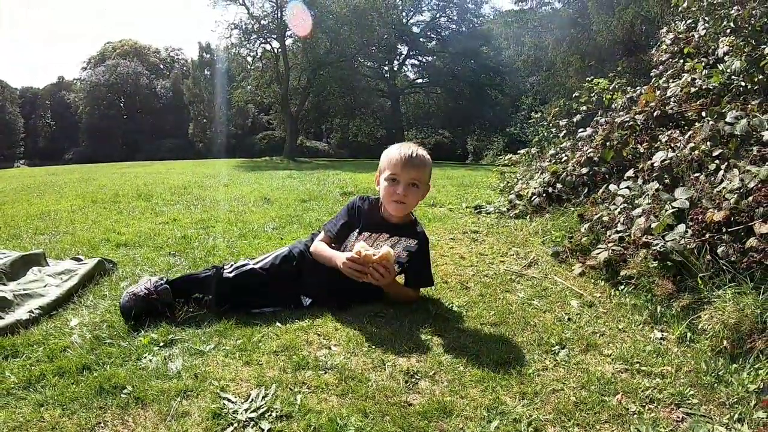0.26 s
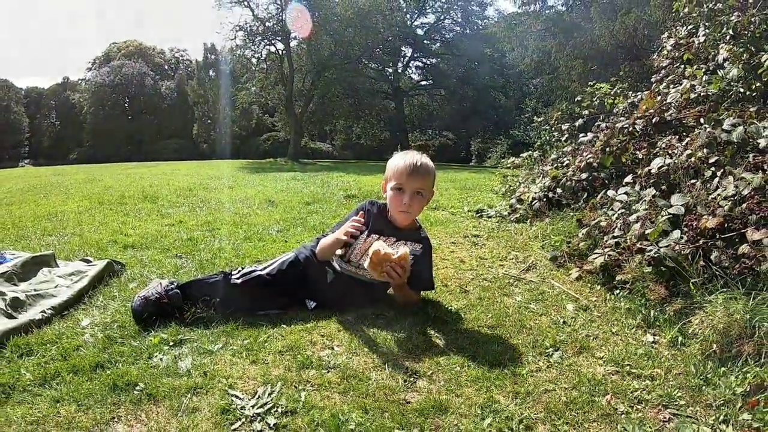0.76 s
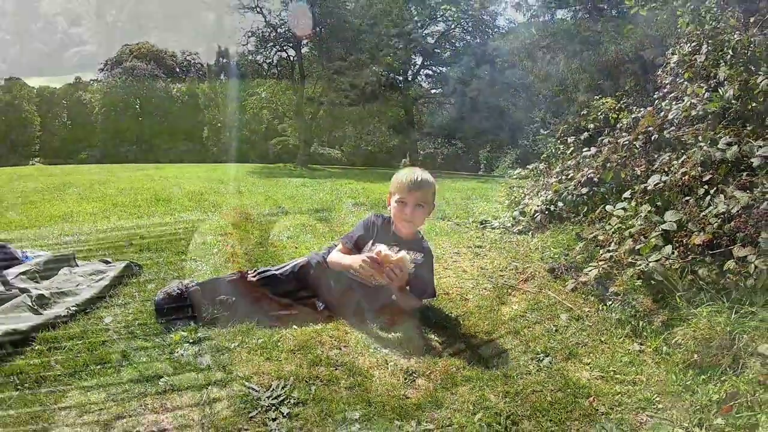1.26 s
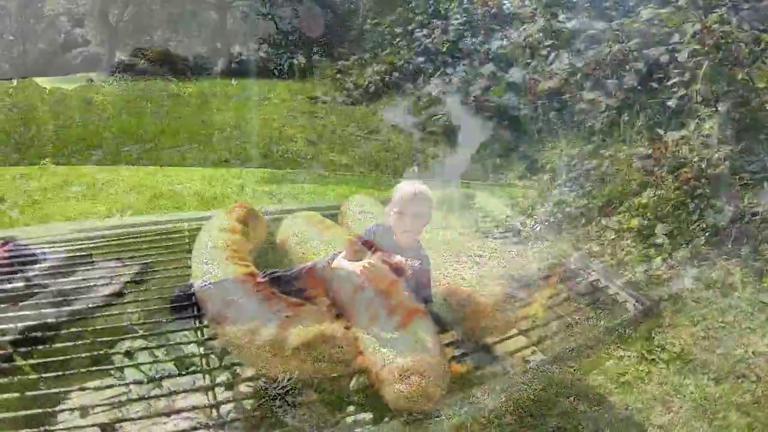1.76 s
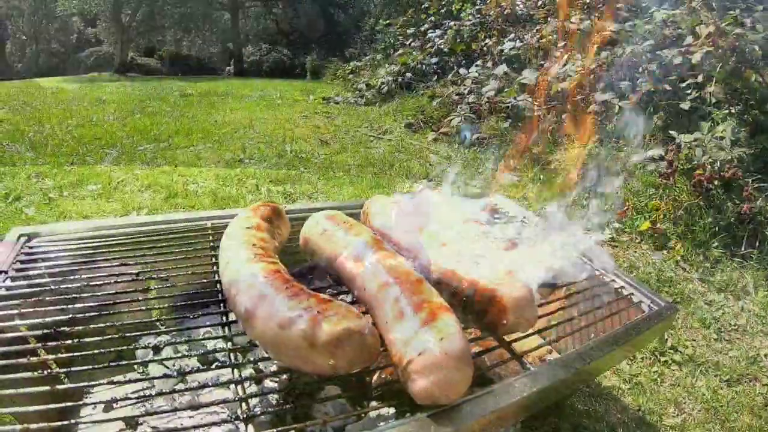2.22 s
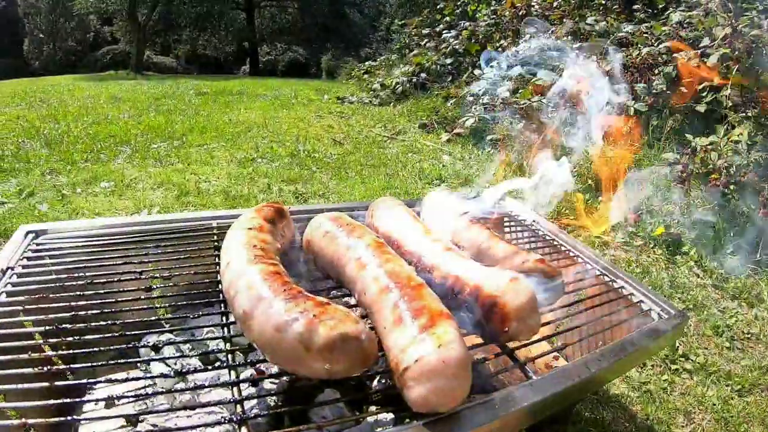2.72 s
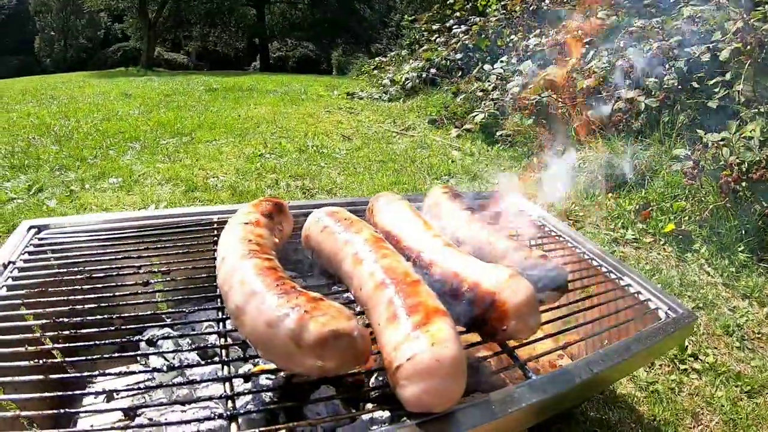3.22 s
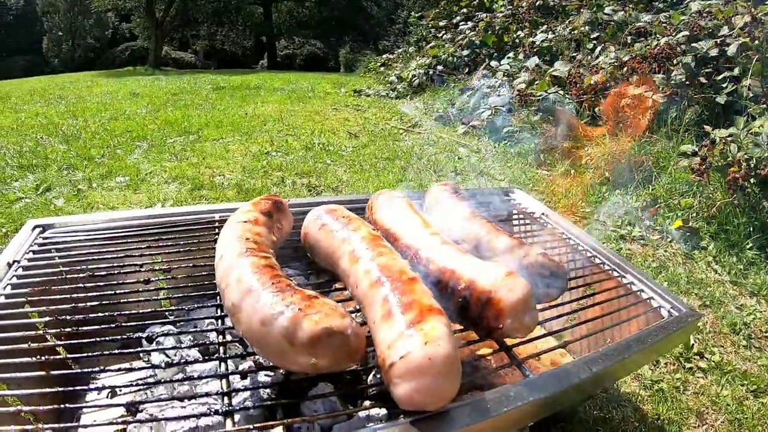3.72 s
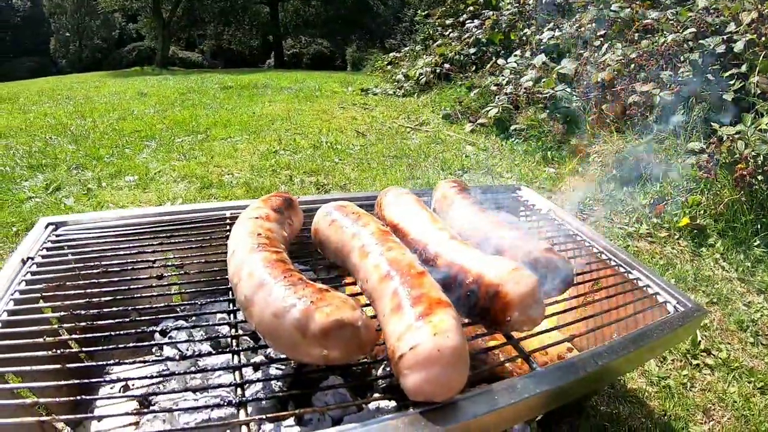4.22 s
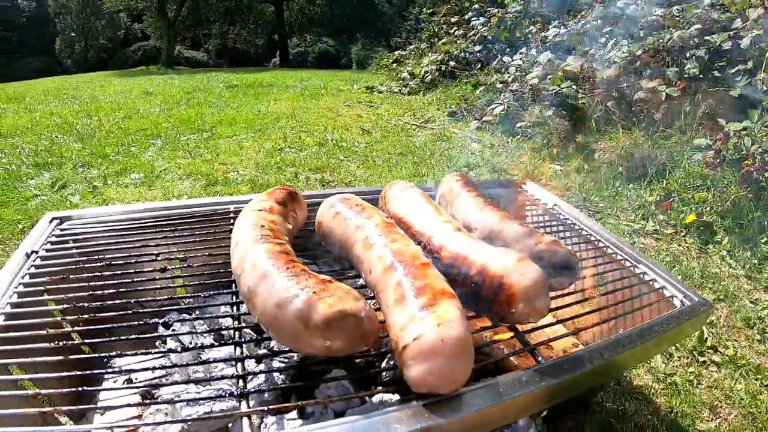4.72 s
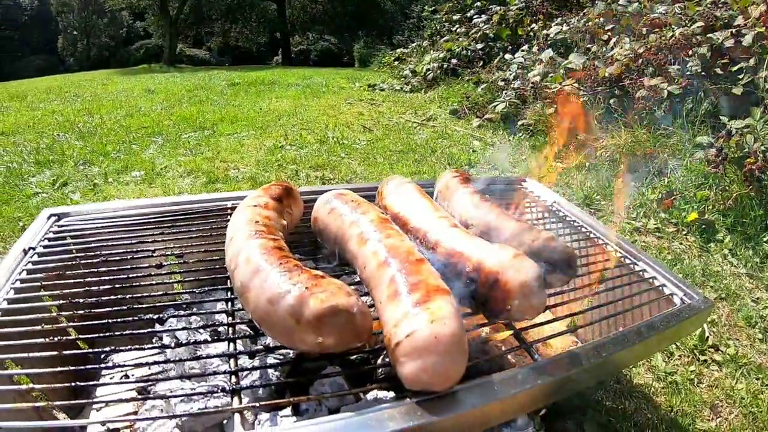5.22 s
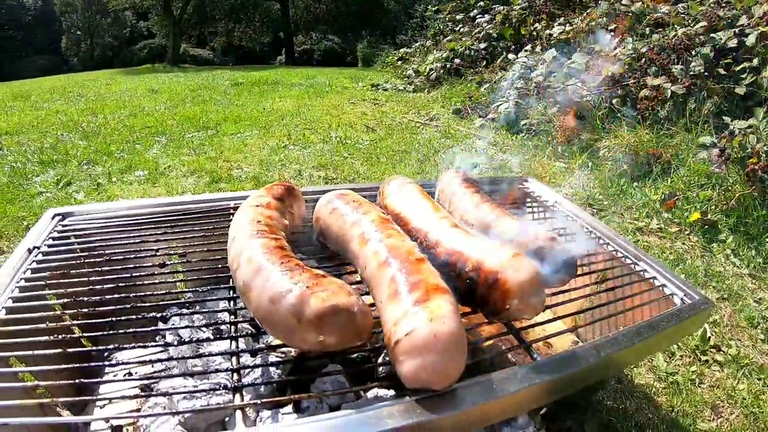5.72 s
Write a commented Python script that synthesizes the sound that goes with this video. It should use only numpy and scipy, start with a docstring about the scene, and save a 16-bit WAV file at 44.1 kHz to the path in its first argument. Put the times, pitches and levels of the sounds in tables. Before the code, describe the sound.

In a quiet park with faint low traffic rumble, a soft bump starts a crisp paper wrapper rustling and creasing at the right. It cuts abruptly to a short silence, then a close charcoal grill fades in quickly: dense sizzling, low flame flutter, sharp spits of fat. Mostly central at first, the sizzle eases and widens later, with brief flare-ups.

```python
"""Far traffic rumbles across a park lawn; a paper wrapper rustles and creases on the right, with two bumps.
The sound cuts out, and a charcoal grill fades in close to the microphone: flames flutter, fat sizzles and spits.
Far and flame layers are coloured noise, paper and fat are clumps of clicks over patchy hiss, creases and spits
are short shaped bursts. A steel tray returns the body of the sizzle and spits a moment later."""
import sys
import numpy as np
from scipy import signal
from scipy.fft import rfft, irfft, next_fast_len
from scipy.io import wavfile
from scipy.ndimage import uniform_filter1d, map_coordinates

SR = 44100
rng = np.random.default_rng(int(sys.argv[2]) if len(sys.argv) > 2 else 0)


def dump(signal):
    """Clip the signal to [-1, 1] and save it as 16-bit WAV at the path in sys.argv[1]."""
    limited = np.clip(np.atleast_2d(signal).T, -1, 1)
    pcm = np.round(limited * 32767).astype(np.int16)
    wavfile.write(sys.argv[1], SR, pcm)


N = 263365

# Spectrum of the far traffic: pitch_hz, relative level_db (per Hz)
TRAFFIC_SPECTRUM = [(65, -46), (110, -11.5), (174, -2), (260, -13), (470, -19), (533, -23), (1280, -21),
                    (7000, -39), (13000, -57.5)]
# Spectrum of the low drone: pitch_hz, relative level_db (per Hz)
DRONE_SPECTRUM = [(25, -31), (50, -12.5), (65, -3.5), (80, -10), (150, -23.5), (300, -38)]
# Faint far tones: pitch_hz, level_db, start_s, end_s
FAR_TONES = [(610, -65.5, 0.14, 0.7), (1088, -66, 0.05, 2)]
# Path of a far whine that rises and sinks: time_s, pitch_hz
GLIDE_PATH = [(0.62, 651), (0.85, 702), (1.1, 742), (1.55, 695.5)]
# Thuds with a tick: start_s, thud_db (nominal, before dulling), thud_hz, tick_over_thud_db
BUMP_EVENTS = [(.388, -21.5, 174, 1.5), (1.228, -25, 201, 8)]
# Resonances of the paper sheet: pitch_hz, width_hz, level_db
PAPER_MODES = [(768, 250, -8), (1600, 173, -1.5), (2367, 190, 2), (3490, 420, 1.5), (4730, 326, 3),
               (6420, 1170, -7.5), (7520, 540, -5), (9350, 1900, -15)]
# Strokes of the hand on the paper: start_s, end_s, level_db (nominal; the stroke ends 1 dB below it)
HAND_STROKES = [(0.552, 0.58, -48), (0.71, .77, -51), (0.793, 1.032, -35.5), (1.07, 1.11, -43),
                (1.13, 1.215, -37), (1.268, 1.296, -40), (1.342, 1.443, -36.5), (1.585, 1.657, -40)]
# Hard creases: start_s, peak_db (mean of both ears)
CREASE_EVENTS = [(0.479, -41), (0.798, -24.5), (0.8625, -21), (1.0115, -18), (1.031, -17.5), (1.1288, -27),
                 (1.1316, -21.5), (1.172, -24), (1.217, -22), (1.284, -24), (1.371, -25), (1.4189, -22.5),
                 (1.436, -29), (1.505, -30), (1.5467, -27.5), (1.6465, -28)]
# The creases drift to the middle: time_s, left_over_right_db
CREASE_DRIFT = [(1.3, -10.5), (1.55, -6), (1.65, -1.5)]
# Grill between the flares: time_s, sizzle_db, fizz_db
GRILL_LEVELS = [(1.9, -36.5, -60), (2.3, -34, -53.5), (3.2, -33, -51.5), (4.0, -33.5, -52.5),
                (4.46, -37.5, -54), (4.8, -36.5, -49), (5.16, -37.5, -48), (5.47, -40, -49.5),
                (5.7, -40, -49), (5.95, -37.5, -46.5)]
# Fat drips on the coals: start_s, rise_db, calming_s
DRIP_FLARES = [(2.25, 3, 0.11), (2.44, 3, 0.06), (4.311, 7, 0.059), (4.37, 3, 0.043), (5.204, 9, 0.072),
               (5.51, 5, 0.09), (5.714, 8.5, 0.0222), (5.81, 6, 0.138)]
# Spectrum of the flames: pitch_hz, relative level_db (per Hz)
FLAME_SPECTRUM = [(18, -33), (30, -8), (54, 0.5), (171, -1), (308, -7.5), (381, -13.5), (520, -20.5),
                  (680, -63)]
# Spectrum of the sizzling body: pitch_hz, relative level_db (per Hz)
SIZZLE_SPECTRUM = [(300, 3), (500, 3.5), (800, 5), (1020, 0.5), (1450, 0), (2000, -4.5), (3300, 2.5),
                   (4500, -0.5), (5200, -14), (6000, -92)]
# Spectrum of the treble fizz: pitch_hz, relative level_db (per Hz)
FIZZ_SPECTRUM = [(3180, -54), (5400, 4.5), (5760, -0.5), (6560, 1.5), (8150, -2), (9160, 0), (11200, -8),
                 (14600, -29)]
# Spectrum of the top treble: pitch_hz, relative level_db (per Hz)
AIR_SPECTRUM = [(10500, -42), (11300, -19.5), (13000, -6.5), (14500, -14.5), (15500, -20.5)]
# Level of the top treble against the fizz: time_s, level_db
AIR_LEVELS = [(2.1, -35), (2.5, -32), (2.75, -12.5), (4.3, -11), (4.8, -16), (5.9, -22)]
# Side level of lower sizzle, upper sizzle, fizz, top: start_s, duration_s, before_db, after_db
STEREO_SIDE = [(4, 0.76, -59, -15), (4.074, 0.92, -67.5, -13.5), (4.15, 0.216, -32.5, -0.5),
               (2.3, .2, -23, 1.5)]
# Spits of fat: start_s, peak_db, upper_over_lower_body_db, treble_over_peak_db
SPIT_EVENTS = [(2.0345, -20, 0, -7), (2.362, -21, 3, -27), (2.4636, -15.5, -3, -30), (2.4991, -13, 1, -22),
               (2.8092, -17.5, 0.5, -27), (2.9403, -15, -5.5, -20.5), (2.956, -20, 13, -6),
               (3.041, -29, 9, -4), (3.1, -18.5, 2, -27), (3.1271, -16.5, 0, -29), (3.427, -21, 4, -22),
               (3.5409, -14, -2, -15), (3.9744, -23, 5, -18), (4.233, -22, 6, -15), (4.285, -25, 2, -12),
               (4.322, -19.5, 9, -10), (4.348, -23, 10, -5), (4.415, -24, -11, -14),
               (4.671, -17.5, 15, -7.5), (4.68, -17.5, 10, -7), (4.775, -25, 13, -15),
               (4.8825, -25.5, -10, -22), (5.2113, -21, -7, -17), (5.217, -20.5, 1, -20),
               (5.227, -18, 7, -15), (5.359, -28, 15, 3), (5.512, -20, 1, -7), (5.811, -21, -7, -18),
               (5.874, -20, 1, -9), (5.9031, -12.5, 19, -6)]

LEAD = 256  # samples in a shaped burst before its blow


def amp(db):
    """Decibels to amplitude."""
    return 10 ** (np.asarray(db) / 20)


def unit(x):
    """Each channel brought to an RMS of 1."""
    return x / np.sqrt(np.mean(x ** 2, axis=-1, keepdims=True) + 1e-20)


def clock():
    """The time of every sample in seconds."""
    return np.arange(N) / SR


def ramp(start_s, over_s):
    """0 before the start, 1 once the span has passed."""
    return np.clip((clock() - start_s) / over_s, 0, 1)


def curves(rows):
    """One value per sample for each column after the time."""
    time_s, *columns = np.transpose(rows)
    return [np.interp(clock(), time_s, column) for column in columns]


def wobble(rate):
    """A smooth random curve, rate knots a second."""
    knots = rng.standard_normal(int(N * rate / SR) + 4)
    return map_coordinates(knots, [np.arange(N) * rate / SR])


def filtered(x, response):
    """x passed through a complex response of frequency."""
    m = next_fast_len(N + 8192)
    return irfft(rfft(x, m) * response(np.fft.rfftfreq(m, 1 / SR)), m)[..., :N]


def colour(points):
    """The gain through (Hz, dB) points on a log axis, closed outside them."""
    f, db = np.transpose(points)
    return lambda hz: amp(np.interp(np.log(hz + 1), np.log(f + 1), db, left=-120, right=-120))


def tinted(x, hz, width_hz, lift_db):
    """x with one band lifted by a level that may change in time."""
    band = filtered(x, lambda f: np.exp(-((f - hz) / width_hz) ** 2))
    return x + (amp(lift_db) - 1) * band


def passing(x, hz, width_hz, lift_db, until_s, fade_s):
    """A tint that fades out."""
    return tinted(x, hz, width_hz, lift_db * (1 - ramp(until_s, fade_s)))


def crackle(rate, spread_db, share, patchy_db):
    """Two white streams: patchy hiss plus tiny clicks of widely spread size that come in clumps."""
    z = signal.stft(rng.standard_normal((2, N)), nperseg=256)[2]
    patches = uniform_filter1d(rng.standard_normal(z.shape[1:]), size=5, axis=0)
    patches = uniform_filter1d(patches, size=10, axis=1)
    patch_gain = amp(patchy_db * patches / patches.std())
    hiss = signal.istft(z * patch_gain, nperseg=256)[1][:, :N]
    fires = rng.random(N) < rate / SR * amp(5 * wobble(30))
    size = np.minimum(rng.exponential(size=N), 3)
    clicks = fires * amp(spread_db * size) * np.sign(rng.standard_normal((2, N)))
    share = np.clip(share, 0, 1)  # power share of the clicks
    return np.sqrt(1 - share) * unit(hiss) + np.sqrt(share) * unit(clicks)


def puff(t60):
    """A burst of noise that starts at once and falls 60 dB in t60 seconds, peak 1."""
    burst = rng.standard_normal(SR // 20) * amp(-60 * np.arange(SR // 20) / SR / t60)
    return burst / np.abs(burst).max()


def shaped(burst, response):
    """A short burst through a response, each row brought to peak 1."""
    m = 4096
    spectrum = rfft(np.pad(burst, (LEAD, 0)), m)
    out = irfft(spectrum * response(np.fft.rfftfreq(m, 1 / SR)), m)
    return out / np.abs(out).max(axis=-1, keepdims=True)


def stereo(pair, side_db, lean=0):
    """Mid from the first stream; side from the second plus a lean (negative is right)."""
    side = amp(side_db) * pair[1] + lean * pair[0]
    return np.array([pair[0] + side, pair[0] - side])


def add(track, s, burst):
    """Mixes a burst in at time s."""
    part = track[..., round(s * SR):][..., :burst.shape[-1]]
    part += burst[..., :part.shape[-1]]


def far_whines():
    """Faint sines waver in level and phase; one more glides up and down in pitch."""
    tones = np.zeros(N)
    for hz, db, start_s, end_s in FAR_TONES:
        gate = ramp(start_s - 0.05, 0.057) * (1 - ramp(end_s, 0.05))
        phase = 2 * np.pi * hz * clock() + 0.4 * wobble(4.7)
        tones += gate * amp(db + 1.7 * wobble(7.1)) * np.sin(phase)
    glide_hz, = curves(GLIDE_PATH)
    glide = np.sin(2 * np.pi * np.cumsum(glide_hz) / SR)
    return tones + ramp(GLIDE_PATH[0][0], 0.23) * amp(-62 + 2 * wobble(8)) * glide


def traffic():
    """Far across the lawn: wide coloured noise, a low drone near mono and faint wavering tones."""
    far = unit(filtered(rng.standard_normal((2, N)), colour(TRAFFIC_SPECTRUM)))
    far_side = filtered(far[1], lambda hz: 1 / (1 + (250 / (hz + 1)) ** 2))  # lows stay central
    drone = unit(filtered(rng.standard_normal((2, N)), colour(DRONE_SPECTRUM)))
    return amp(-52) * stereo([far[0], far_side], -4.1) + amp(-41.5) * stereo(drone, -26) + far_whines()


def bumps():
    """A short dull tick that differs from ear to ear, then a soft low push."""
    push_lag_s = 0.0028
    out, t = np.zeros((2, N)), np.arange(SR // 20) / SR
    for s, db, hz, tick_db in BUMP_EVENTS:
        swell = np.e * t * hz / 0.47 * np.exp(-t * hz / 0.29)
        push = swell * np.sin(2 * np.pi * hz * t)
        add(out, s + push_lag_s, amp(db) * push)
        add(out, s, amp(db + tick_db) * stereo([puff(0.069), puff(0.035)], -3))
    return filtered(out, lambda hz: 1 / (1 + 1j * hz / 1200) / (1 + (hz / 11000) ** 8))


def hand():
    """Level of the rustle: each stroke sets in fast, swells and dies away over a faint shifting sheet."""
    swell_db, rise_db_per_s, fall_db_per_s = 2, 397.5, 218
    rest_db, rest_from_s = -49, 0.56
    t = clock()
    power = amp(2 * (rest_db - fall_db_per_s / 2 * np.maximum(rest_from_s - t, 0)))
    for start_s, end_s, db in HAND_STROKES:
        level_db = db - swell_db * (1.5 - ramp(start_s, end_s - start_s))
        level_db = level_db - rise_db_per_s * np.maximum(start_s - t, 0)
        level_db = level_db - fall_db_per_s * np.maximum(t - end_s, 0)
        power = power + amp(2 * level_db)
    return np.sqrt(power)


def sheet(f):
    """Response of the paper: broad resonances of alternating sign, rolled off at the top."""
    modes = 0
    for k, (hz, width_hz, db) in enumerate(PAPER_MODES):
        damping = 1j * f * width_hz
        modes = modes + (-1) ** k * amp(db) * damping / (hz * hz - f * f + damping)
    return modes / (1 + (f / 11000) ** 5)


def rustle():
    """Rubbed grains ring the sheet; it slackens, its resonances sink and its treble dulls as it softens."""
    slack, slack_ratio = ramp(1.3, 0.5), 0.9206
    bright_db = -3 - 3 * np.maximum(clock() - HAND_STROKES[0][0], 0)  # dulls by 3 dB per second
    rub = crackle(1800, 8.4, 0.34, patchy_db=1.5) * amp(1.12 * wobble(24.96))
    taut_grains = filtered(rub * (1 - slack), sheet)
    grains = taut_grains + filtered(rub * slack, lambda f: sheet(f / slack_ratio))
    dull = unit(filtered(grains, lambda hz: hz < 5500))
    bright = unit(filtered(grains, lambda hz: hz >= 5500))
    dull_share = np.sqrt(np.clip(1 - amp(2 * bright_db), 0.02, 1))
    dull_part = dull_share * stereo(dull, -7, lean=-0.35)
    return hand() * (dull_part + amp(bright_db) * stereo(bright, -2.5, lean=-0.6))


def wrapper():
    """Paper at the right: rustled grains ring in broad resonances, harder creases stand out."""
    out = rustle() * (np.arange(N) > BUMP_EVENTS[0][0] * SR)  # the hand reaches the paper at the first bump
    crisp = lambda f: sheet(f) / (1 + (2000 / (f + 1)) ** 4)  # a crease barely moves the low modes
    for s, db in CREASE_EVENTS:
        pan_db = np.interp(s, *np.transpose(CREASE_DRIFT))
        sides = amp(pan_db * np.array([[0.5], [-0.5]]))
        snap = shaped(puff(0.0055) + 0.37 * puff(0.03), crisp)
        add(out, s - LEAD / SR - 0.0005, amp(db) * sides / sides.mean() * snap)
    return out


def flaring():
    """Extra level in dB: each drip flares within 12 ms and calms more slowly."""
    rise = 0
    for s, db, calm_s in DRIP_FLARES:
        rise = rise + db * ramp(s, 0.012) * np.exp(-np.maximum(clock() - s, 0) / calm_s)
    return rise


def flames(flutter):
    """Flame noise near mono, low in pitch, its level fluttering."""
    noise = filtered(crackle(150, 4.3, 0.17, patchy_db=-1.5), colour(FLAME_SPECTRUM))
    return stereo(unit(amp(0.27 * flutter) * noise), -57.5)


def pops():
    """Two streams of small fat bubbles in clumps, each ringing a few cycles at its own pitch."""
    rate, pitch_hz, spread_octaves, life_cycles, size_spread_db = 900, 2990, 0.6, 1.8, 3.5
    fires = rng.random(N) < rate / SR * amp(2.5 * wobble(40))
    draw = rng.standard_normal((N, 2))[fires]
    size = amp(size_spread_db * np.minimum(rng.exponential(size=N), 3))[fires, None]
    hz = np.clip(pitch_hz * 2 ** (spread_octaves * draw[:, :1]), 1200, 9000)
    turns = hz * np.arange(SR // 100) / SR
    envelope = np.exp(-turns / life_cycles * 2) * (1 - np.exp(-2 * turns))
    ring = size * np.sin(2 * np.pi * turns) * envelope
    at = (np.flatnonzero(fires)[:, None] + np.arange(SR // 100)).ravel()
    signs = (1, np.sign(draw[:, 1:]))  # random signs set the second stream apart
    return unit(np.array([np.bincount(at, (ring * sign).ravel(), minlength=N)[:N] for sign in signs]))


def tray_body(hz):
    """Response of the sizzling body with one echo off the steel tray, duller than the direct sound."""
    delay_s, share = 0.001414, 0.37
    echo = share * np.exp(-2j * np.pi * hz * delay_s) / (1 + (hz / 3500) ** 2)
    return colour(SIZZLE_SPECTRUM)(hz) * (1 + echo)


def fat_sizzle(seethe):
    """Bursting and ringing bubbles over the tray; the hiss is sharper while the fat is fresh."""
    sharp_db = 3 - 7 * ramp(3.27, 0.046)
    sizzle = unit(filtered(seethe + amp(-8) * pops(), tray_body))
    sizzle = tinted(sizzle, 3510, 250, sharp_db)
    # a slight dip near 4 kHz until about 4 s
    return passing(sizzle, hz=4150, width_hz=302, lift_db=-4, until_s=4, fade_s=0.1)


def spit_bands(hz):
    """Lower body, upper body and treble of a spit, swept downward by a lag that grows toward the lows."""
    slim_hz = 820  # a spit is too small to sound much below this
    lag_s, half_lag_hz = 0.0012, 1470  # lag of the lowest part, pitch where it has halved
    body = tray_body(hz)
    lower = body * (hz < 2500) / (1 + (slim_hz / (hz + 1)) ** 2)
    upper = body * (hz >= 2500)
    treble = colour(FIZZ_SPECTRUM)(hz) + 0.4 * colour(AIR_SPECTRUM)(hz)
    sweep = np.exp(-2j * np.pi * lag_s * half_lag_hz * np.log(1 + hz / half_lag_hz))
    return np.array([lower, upper, treble]) * sweep


def fat_spits():
    """Each skin of fat bursts with a crack, then sprays."""
    out = np.zeros(N)
    for s, db, tilt_db, treble_db in SPIT_EVENTS:
        band_db = [db - max(tilt_db, 0), db + min(tilt_db, 0), db + treble_db]
        burst = 0.38 * puff(0.0025) + 0.088 * puff(0.059)  # spray
        burst[:2] = np.sign(burst[0])  # the crack itself
        add(out, s - LEAD / SR - 0.0006, amp(band_db) @ shaped(burst, spit_bands))
    return out


def grill():
    """Close grill: fluttering flames under bands of bursting fat bubbles."""
    calm_db, calm_fizz_db = curves(GRILL_LEVELS)
    air_db, = curves(AIR_LEVELS)
    flare_db = flaring()
    flame_db = calm_db + 0.757 * flare_db + 1.5
    fizz_db = calm_fizz_db + 0.89 * flare_db
    low_side_db, high_side_db, fizz_side_db, air_side_db = [
        before + (after - before) * ramp(s, over_s) for s, over_s, before, after in STEREO_SIDE]

    flutter = wobble(22.027)  # shared by flames and fat
    seethe = crackle(1500, 5.3, 0.21, patchy_db=1.5) * amp(1.1 * flutter + 1.17 * wobble(70))
    seethe = seethe + 0.31 * crackle(160, 6.2, 0.9, patchy_db=7)  # sparser, sharper bubbles
    sizzle = fat_sizzle(seethe)
    lower = filtered(sizzle, lambda hz: 1 / (1 + (hz / 1900) ** 8))
    fizz = unit(filtered(seethe, colour(FIZZ_SPECTRUM)))
    fizz = passing(fizz, hz=7540, width_hz=240, lift_db=4.3, until_s=4.1, fade_s=0.3)  # an early sheen
    air = unit(filtered(seethe, colour(AIR_SPECTRUM)))

    body = stereo(lower, low_side_db, lean=-amp(low_side_db))
    body = body + stereo(sizzle - lower, high_side_db, lean=-amp(high_side_db - 7))
    treble = stereo(fizz, fizz_side_db, lean=-amp(fizz_side_db - 17))
    treble = treble + amp(air_db) * stereo(air, air_side_db)
    # late spits are louder at the right
    spits = fat_spits() * (1 + amp(high_side_db + 2) * np.array([[-1], [1]]))
    return amp(flame_db) * flames(flutter) + amp(calm_db + flare_db) * body + amp(fizz_db) * treble + spits


def scene():
    """The lawn until the cut, silence, then the grill fades in."""
    t = clock()
    lawn_gain = t < 1.68
    fade_s, fade_tau_s, fade_bend = 1.84, 0.0357, 2.43
    grill_gain = (1 - np.exp(-np.maximum(t - fade_s, 0) / fade_tau_s)) ** fade_bend
    return lawn_gain * (traffic() + bumps() + wrapper()) + grill_gain * grill()


def record(dry):
    """The camera keeps nothing above its band limit of 15.5 kHz."""
    return filtered(dry, lambda hz: hz < 15500)


dry = scene()
out = record(dry)
dump(out)
```